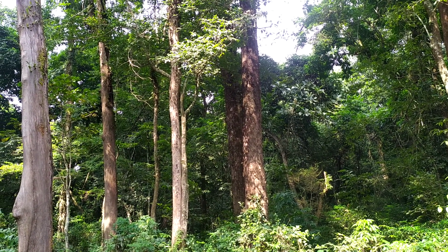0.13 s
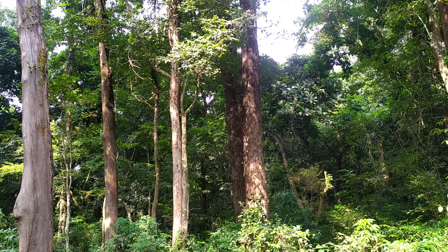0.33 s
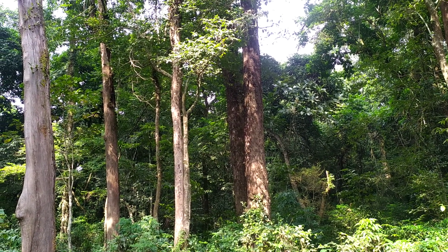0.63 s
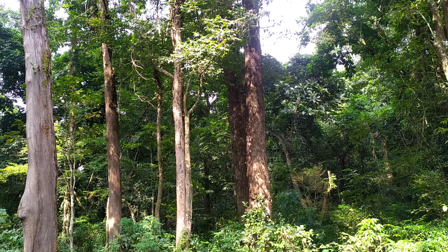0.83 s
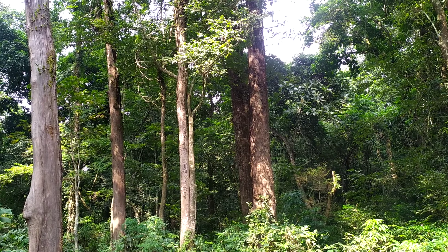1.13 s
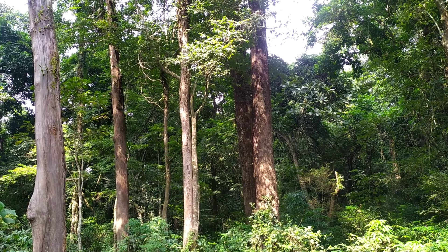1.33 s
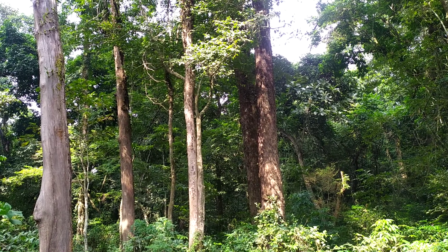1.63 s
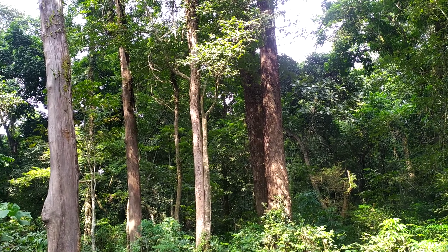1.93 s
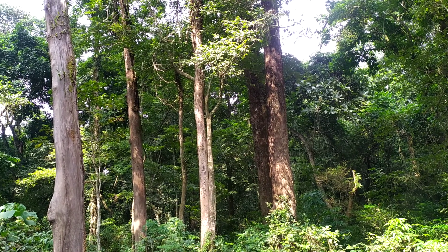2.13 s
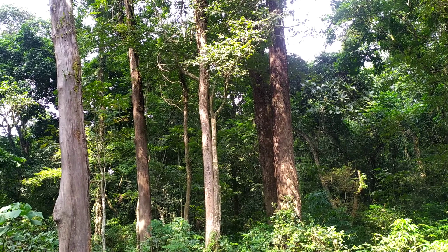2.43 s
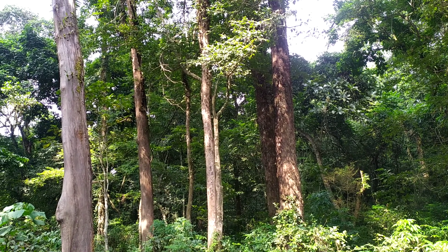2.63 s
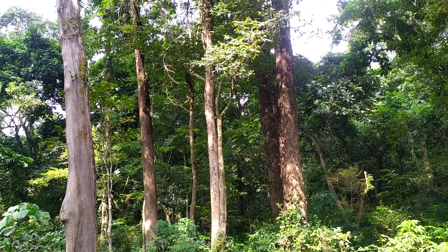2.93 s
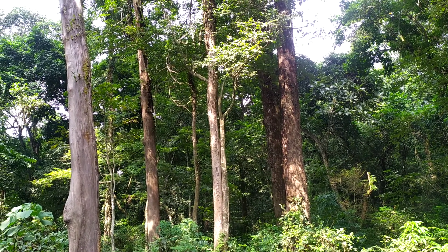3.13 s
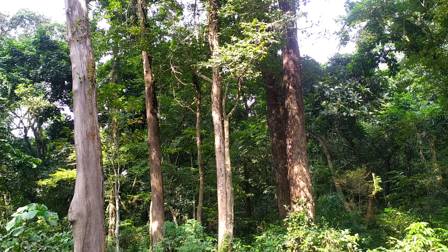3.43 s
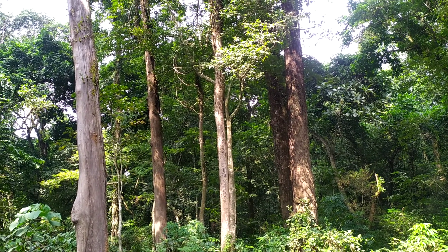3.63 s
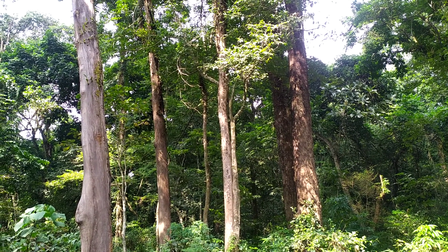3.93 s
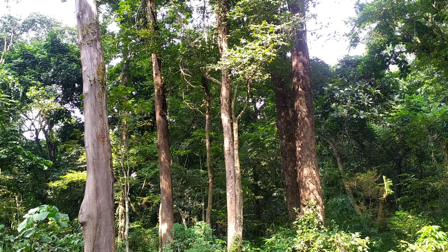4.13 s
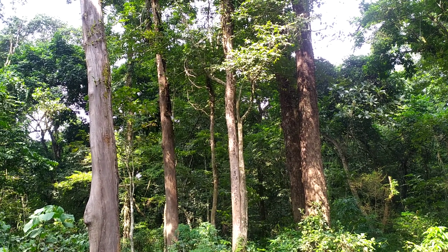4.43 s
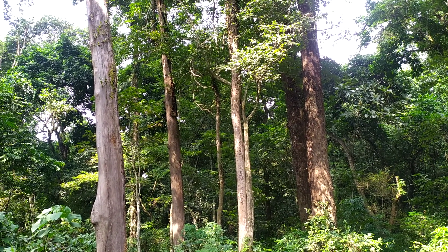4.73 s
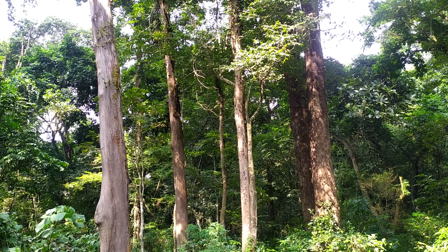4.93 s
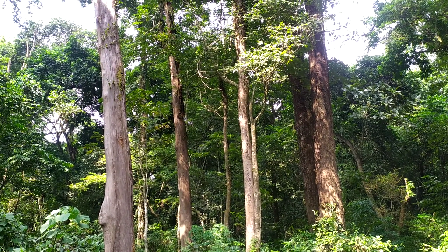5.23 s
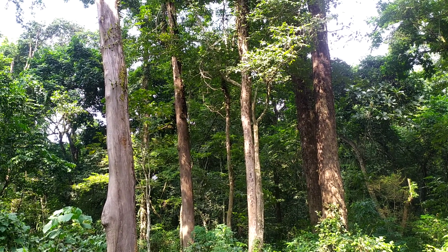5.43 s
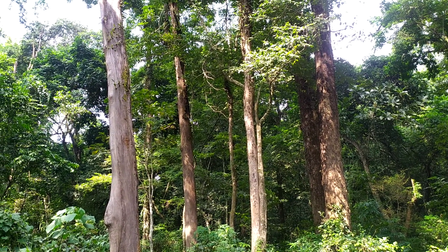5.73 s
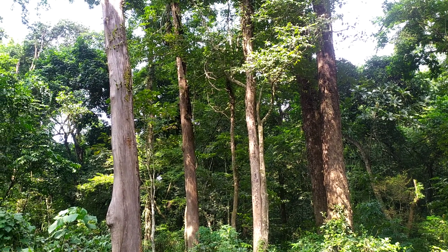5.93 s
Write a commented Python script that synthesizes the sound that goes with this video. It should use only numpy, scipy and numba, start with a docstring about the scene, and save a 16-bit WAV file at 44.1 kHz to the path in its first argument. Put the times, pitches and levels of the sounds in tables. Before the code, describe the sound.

In a forest, many cicadas hold a high, ringing drone from start to finish, their tones wavering slightly against each other and scattering among the trees. Early on, soft wind bumps and small finger taps and rubs touch the hand-held microphone, then thin out to an occasional tick or puff. The insects stay much the loudest sound, above barely audible rustle and hum.

```python
"""A forest at midday, cicadas all round, heard through the two microphone ports of a hand-held camera.
Each cicada buckles its tymbals some 296 times a second, at its own rate, so their ringing lines beat;
uneven clicks add a rasp, and trunks scatter the song on its way. Right at the microphone, light wind
buffets the ports and fingers rub and tick on the shell. Behind lie far rustle, hiss and a faint hum."""
import sys
import numpy as np
from scipy import signal
from scipy.fft import rfft, irfft, next_fast_len
from scipy.io import wavfile
from scipy.ndimage import uniform_filter1d
from numba import njit

SR = 44100
rng = np.random.default_rng(int(sys.argv[2]) if len(sys.argv) > 2 else 0)


def wrap_up_sound(samples):
    """Save the sound to the file named by the first command line argument, as 16-bit audio."""
    columns = np.atleast_2d(samples).T
    # keep every value between -1 and 1, then stretch to whole-number steps
    tamed = np.clip(columns, -1, 1)
    steps = np.round(tamed * 32767).astype(np.int16)
    wavfile.write(sys.argv[1], SR, steps)


N = 267819

# One row a cicada; a few tire and run slow: buckling rate/Hz, level/dB
CICADAS = [(297.9, -10), (297.5, -4), (297.1, 0), (296.8, 0), (296.5, -1), (296.2, -1.5), (295.8, -3),
           (295.4, -6), (294.9, -9), (294.3, -12), (293.1, -17), (292.3, -16), (291.5, -18), (289.5, -29)]
# Ten rib clicks a cycle make multiples 10, 20, .. 50 of the rate ring loud: level/dB
LOUD_LINES = [-2.5, -0.5, -10, -24, -32.5]
# The nine weak lines after each loud one; two tymbals favour the even ones: level/dB
WEAK_LINES = [-28, -24.5, -38, -30, -40.5, -34, -49, -26, -32]
# Tilt of the weak lines: f/Hz, gain/dB
WEAK_TILT = [(2400, -1.5), (3600, -2.14), (5900, -0.35), (8300, 0.8), (9500, -5), (11300, -9.5),
             (13000, -15), (14800, -21)]
# Course of the song: t/s, level/dB, left minus right/dB (taken about its mean)
SONG_COURSE = [(0.0, -33.5, 5), (1.3, -34, 3), (2.4, -34, 2), (3.3, -34.5, 4.5), (4.1, -34.5, 5),
               (6.07, -35, 3.5)]
# Bands of hiss from uneven clicks: f/Hz, width/Hz, level/dB
RASP_BANDS = [(2934, 504, -61.5), (5910, 990, -59), (7250, 2000, -70), (8830, 1000, -60.5),
              (10500, 1100, -76.5), (11560, 1400, -70.5), (13400, 3000, -72.5), (4130, 550, -78.5)]
# Balance of the chorus at the two ports: f/Hz, left minus right/dB
PORT_BALANCE = [(2400, 1.6), (3000, -2.5), (4200, -0.9), (5900, 7), (8900, 2), (11900, 6.5), (14800, 3)]
# Wind on the microphone: peak t/s, level/dB, fade/(dB/s)
WIND_BUFFETS = [(0.005, -60, 250), (0.184, -67, 170), (0.915, -61.5, 250), (1.016, -52, 450),
                (1.1, -56, 298), (1.26, -67, 120), (1.378, -66, 100), (1.685, -48.5, 100),
                (1.805, -55, 222), (1.88, -62.5, 202), (1.95, -63.5, 150), (2.09, -64, 200),
                (2.814, -65, 150), (2.9, -69, 200), (3.25, -64.5, 200), (4.06, -65.5, 98),
                (4.5, -58.5, 173)]
# Fingers on the camera: t/s, peak level/dB, rise of the push/ms, left minus right/dB
FINGER_TICKS = [(0.039, -58.5, 0.95, 1), (0.173, -50.5, 1.05, 0), (.306, -56.5, 2.4, .5),
                (0.683, -51.5, 0.96, 0), (0.881, -54, 1.3, 2), (.892, -53, 0.32, 11), (.99, -52, 1.6, 0),
                (1.071, -47.5, 3.5, 1), (1.276, -55, 0.66, -1), (1.374, -54, 2.1, 0), (1.53, -56, 1.4, 0),
                (1.798, -44, 2.7, -3), (1.994, -57, 0.76, 3), (2.406, -53.5, 1.6, -1),
                (2.426, -48.5, 0.29, -3), (2.809, -56.5, 2.6, -14), (3.019, -66, 1.6, 1),
                (3.959, -62, 2.2, 1), (4.125, -57, 0.59, -1), (4.277, -60, 1.7, 0),
                (4.472, -59.5, 0.15, -13), (4.631, -61, 1, -6), (4.668, -59, 0.98, 0),
                (5.419, -50, 0.51, -1), (5.861, -54, 2.3, -1)]
# Modes of the camera's shell: f/Hz, level/dB, T60/s
SHELL_MODES = [(172, -11, 0.13), (319, 2, 0.041), (560, -3, 0.022), (777, 9, 0.02), (1160, 1, 0.013),
               (1490, -4, .01)]
# Skin sliding on the shell: peak t/s, level/dB, fade/(dB/s)
SKIN_RUBS = [(0.03, -74, 100), (1.11, -69.5, 22), (1.28, -74, 400), (1.38, -77, 200), (1.54, -79, 300),
             (5.87, -74, 200)]
# Spectrum of far rustle and camera hiss: f/Hz, relative level/dB
AIR_SPECTRUM = [(22, -10), (32, -10), (45, -1.5), (75, 6), (130, 2.5), (300, -4.5), (700, -8.5),
                (1480, -10), (2200, -8.5), (3000, -6), (5000, -62)]
# Likeness of that background at the two ports: f/Hz, correlation
AIR_LIKENESS = [(40, 0.51), (120, 0.15), (400, 0.57), (900, -0.031), (1500, -0.16), (2500, 0.047)]

FIRST_MULTIPLE, LAST_MULTIPLE, RIBS = 8, 50, 10
WANDER_HZ, QUIVER_HZ = .3, .45  # slow and fast spread of the buckling rate
SCATTER_T60_S, SCATTER_DB = 1, 3.5  # level against the direct sound
HOLD = 16  # samples between updates of the song's pitch and loudness
AIR_DB, HUM_HZ, HUM_DB = -71, 51.5, -71.5


def tymbal_cycle(rate_hz):
    """One cycle of buckling ribs: loud lines with weak ones between, in random phase."""
    k = np.arange(FIRST_MULTIPLE, LAST_MULTIPLE + 1)
    weak_db = np.take(WEAK_LINES, k % RIBS - 1) + over_hz(WEAK_TILT, k * rate_hz)
    line_db = np.where(k % RIBS, weak_db, np.take(LOUD_LINES, k // RIBS - 1))
    lines = np.zeros(2 ** 11 + 1, complex)
    lines[k] = undb(line_db) * np.exp(2j * np.pi * rng.random(len(k)))
    return irfft(lines)


def cicada(rate_hz):
    """The tymbal cycle repeats at a rate that wanders and quivers, with a second of lead-in."""
    steps = (N + SR) // HOLD + 1
    drift_hz = WANDER_HZ * walk(1.2, steps, HOLD) + QUIVER_HZ * walk(14, steps, HOLD)
    # the strokes vary in strength, more in some moments than in others
    flutter_db = 0.673 * walk(150, steps, HOLD) * undb(6 * walk(3.15, steps, HOLD))
    return repeat(tymbal_cycle(rate_hz), (rate_hz + drift_hz) / SR, undb(flutter_db), HOLD)


def trunks():
    """Response from one cicada to each port: the direct sound and a decaying scatter off the trees."""
    fade = np.exp(-np.log(1000) * np.arange(SR) / SR / SCATTER_T60_S)
    paths = rng.standard_normal((2, SR)) * fade * undb(SCATTER_DB) / np.sqrt(np.sum(fade ** 2))
    paths[:, rng.integers(40, size=2)] += np.eye(2)  # direct sound, within a millisecond
    return paths


def rasp():
    """Uneven clicks leave hiss round the ringing lines; each band swells on its own."""
    out = np.zeros((2, N))
    for centre, width, db in RASP_BANDS:
        band = shape(rng.standard_normal((2, N)), lambda hz: resonance(hz, centre, width) ** 3)
        out += band * np.sqrt(SR / width) * undb(db + 1.8 * walk(12))
    return out


def chorus():
    """Cicadas all round, each reaching the microphone by its own paths through the trunks."""
    size = next_fast_len(N + SR, real=True)
    spectrum = sum(undb(db) * rfft(cicada(hz), size) * rfft(trunks(), size) for hz, db in CICADAS)
    song = irfft(spectrum, size)[:, SR:N + SR]
    level_db, pan_db = curve(SONG_COURSE)
    song = level(song, 0) * undb(level_db) * sides(pan_db - pan_db.mean())
    return shape(song + rasp(), lambda hz: sides(over_hz(PORT_BALANCE, hz)))


def wind():
    """Light wind thuds right on the ports, each buffet a full swing of pressure."""
    noise = rng.standard_normal((2, N))
    mid, side = shape(noise, lambda hz: resonance(hz, centre_hz=62, width_hz=52) ** 3)
    mid = mid / np.sqrt(uniform_filter1d(mid ** 2, SR // 40)) * mid.std()  # even out over 25 ms
    pressure = np.array([mid + 0.1 * side, mid - 0.55 * side])
    return level(pressure, 0) * swells(WIND_BUFFETS, rise_db_s=595)


def finger_ticks():
    """Fingers tick on the shell that holds the microphone: a longer contact rings duller."""
    out = np.zeros((2, N))
    t = np.arange(2 ** 12) / SR
    for s, db, rise_ms, pan_db in FINGER_TICKS:
        shell = np.zeros((2, len(t)))
        for hz, mode_db, t60 in SHELL_MODES:
            # each touch lands elsewhere: modes shift, and weigh differently at the two ports
            chance = rng.standard_normal((2, 1))
            mode = np.sin(2 * np.pi * hz * (1 + 0.1 * chance[0]) * t)
            shell += undb(mode_db + 1.2 * chance) * np.exp(-np.log(1000) * t / t60) * mode
        push = np.hanning(int(2 * rise_ms * SR / 1000) + 3)
        tick = signal.lfilter(push, 1, shell)
        tick *= undb(db) / np.abs(tick).max() * sides(pan_db)[:, None]
        start = int(s * SR)
        out[:, start:start + len(t)] += tick[:, :N - start]
    return out


def skin_rubs():
    """Skin slides over the shell in grains, close to the ports."""
    grains = rng.standard_normal((2, N)) * undb(4 * walk(90))
    friction = shape(grains, lambda hz: resonance(hz, centre_hz=300, width_hz=710) ** 2)
    return level(friction, 0) * swells(SKIN_RUBS, rise_db_s=250)


def air():
    """Far rustle and the camera's own hiss over a low hum; the bass is partly alike left and right."""
    mid, side = shape(rng.standard_normal((2, N)), lambda hz: undb(over_hz(AIR_SPECTRUM, hz)))
    mid = shape(mid, lambda hz: np.sqrt(1 + over_hz(AIR_LIKENESS, hz)))
    side = shape(side, lambda hz: np.sqrt(1 - over_hz(AIR_LIKENESS, hz)))
    hum = np.sin(2 * np.pi * HUM_HZ * np.arange(N) / SR) * undb(0.73 * walk(2.94))
    flicker = undb(1.1 * walk(10))
    return level(np.array([mid + side, mid - side]) * flicker, AIR_DB) + level(hum, HUM_DB)


def undb(db):
    """Decibels to gain."""
    return np.exp(np.asarray(db) * np.log(10) / 20)


def level(x, db):
    """Set the rms level."""
    return x * undb(db) / np.sqrt(np.mean(x ** 2))


def sides(pan_db):
    """Left and right gain."""
    return undb(np.array([pan_db, -pan_db]) / 2)


def curve(table):
    """Value columns of a (t/s, value, ..) table, one value a sample."""
    s, *columns = np.transpose(table)
    return [np.interp(np.arange(N) / SR, s, c) for c in columns]


def over_hz(table, hz):
    """An (f/Hz, value) table read on a log-frequency axis."""
    at, value = np.transpose(table)
    return np.interp(np.log(hz + 1), np.log(at), value)


def shape(x, gain):
    """Filter by a gain that is a function of frequency."""
    size = next_fast_len(N, real=True)
    return irfft(rfft(x, size) * gain(np.arange(size // 2 + 1) * SR / size), size)[..., :N]


def resonance(hz, centre_hz, width_hz):
    """Gain of one resonance, 1 at its centre."""
    return 1 / np.sqrt(1 + ((hz - centre_hz ** 2 / (hz + 1)) / width_hz) ** 2)


def walk(rate, size=N, hold=1):
    """Smooth random motion, rate changes a second, one value every hold samples; spread near 1."""
    k = int(SR / hold / rate)
    stairs = np.repeat(rng.standard_normal(size // k + 1), k)
    return 1.3 * uniform_filter1d(uniform_filter1d(stairs, k), k)[:size]


def swells(table, rise_db_s):
    """Gain of events that each climb to a peak and fade at a steady rate in dB."""
    t = np.arange(N) / SR
    return sum(undb(db - np.maximum(rise_db_s * (s - t), fade * (t - s))) for s, db, fade in table)


@njit
def repeat(cycle, turns, gain, hold):
    """Play one cycle over and over, advancing by the share of it given in turns each sample."""
    out, place = np.empty(len(turns) * hold), 0.
    for i in range(len(out)):
        place += turns[i // hold] * len(cycle)
        if place >= len(cycle):
            place -= len(cycle)
        k = int(place)
        slope = cycle[(k + 1) % len(cycle)] - cycle[k]
        out[i] = gain[i // hold] * (cycle[k] + (place - k) * slope)
    return out


def scene():
    """The chorus all round, wind and hand at the microphone, faint air behind."""
    return chorus() + wind() + finger_ticks() + skin_rubs() + air()


def record(dry):
    """The camera trims the bass below 36 Hz and cuts the top above 15.5 kHz."""
    trimmed = signal.sosfilt(signal.butter(N=3, Wn=36, btype="high", fs=SR, output="sos"), dry)
    return signal.sosfilt(signal.ellip(8, .2, 70, 15500, fs=SR, output="sos"), trimmed)


dry = scene()
out = record(dry)
wrap_up_sound(out)
```